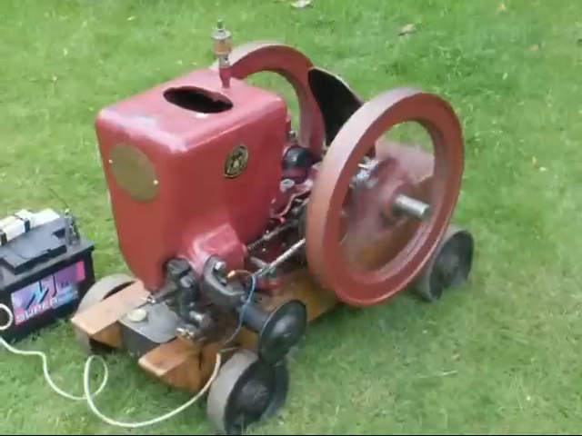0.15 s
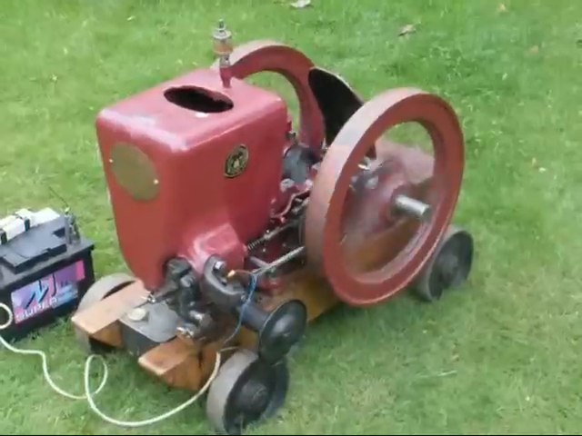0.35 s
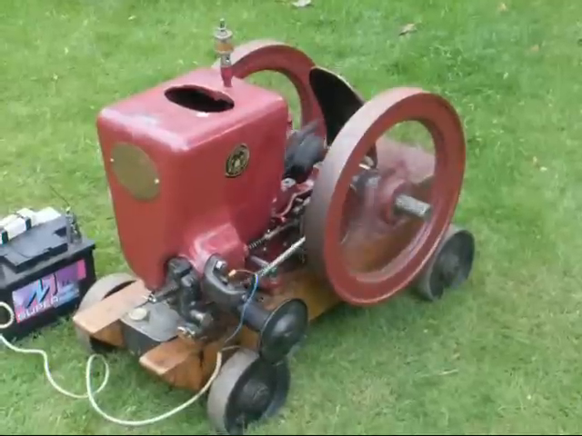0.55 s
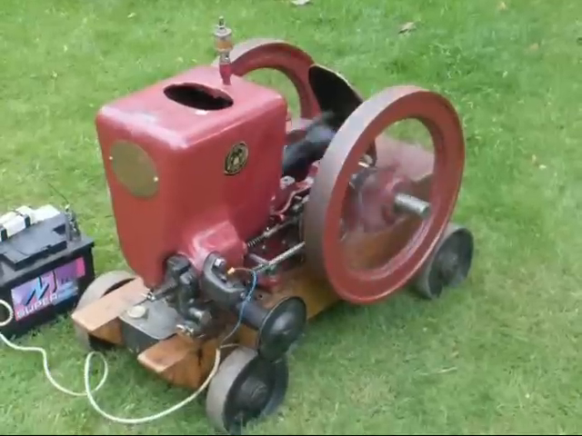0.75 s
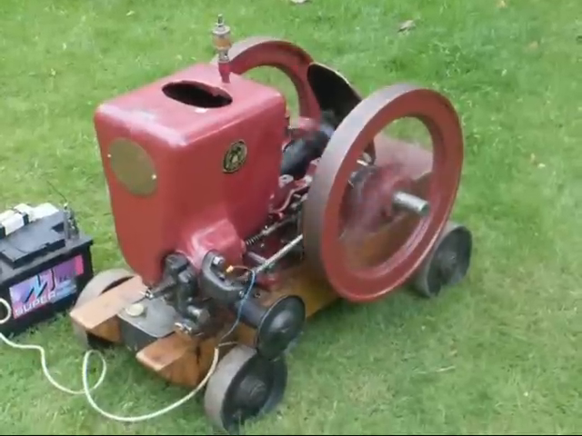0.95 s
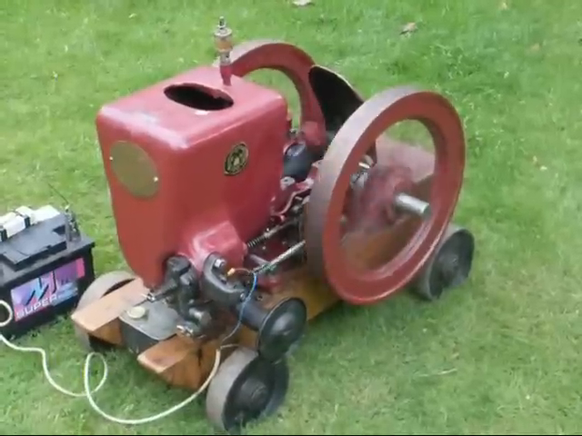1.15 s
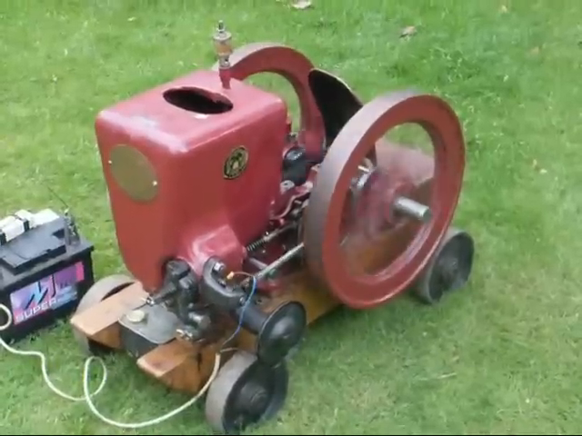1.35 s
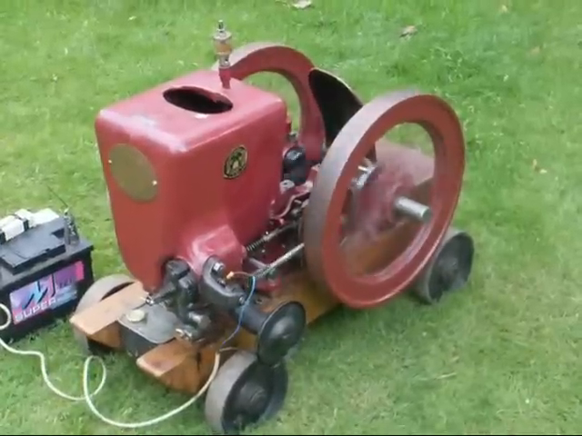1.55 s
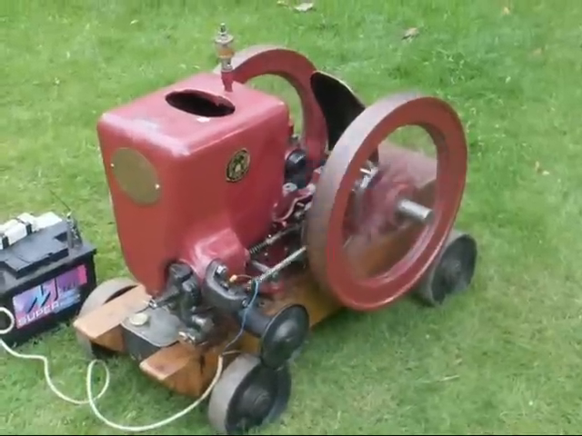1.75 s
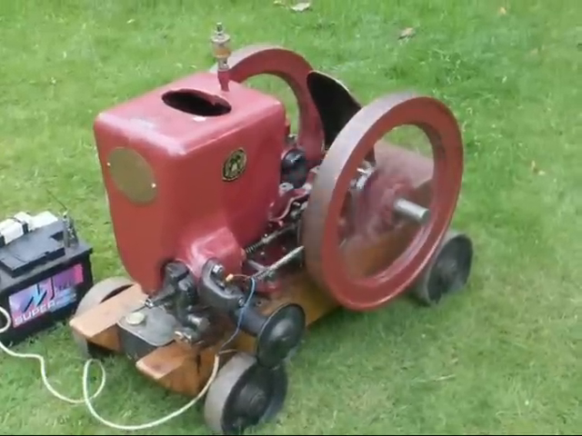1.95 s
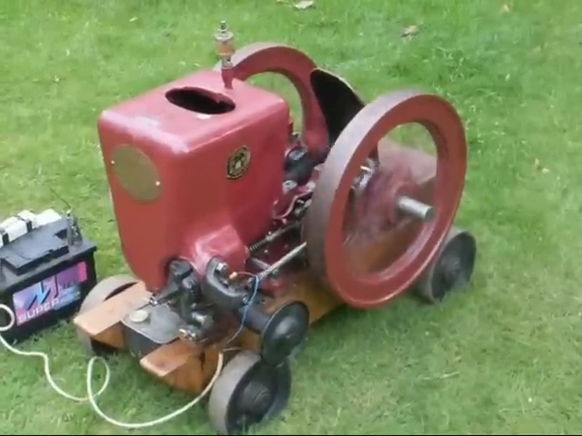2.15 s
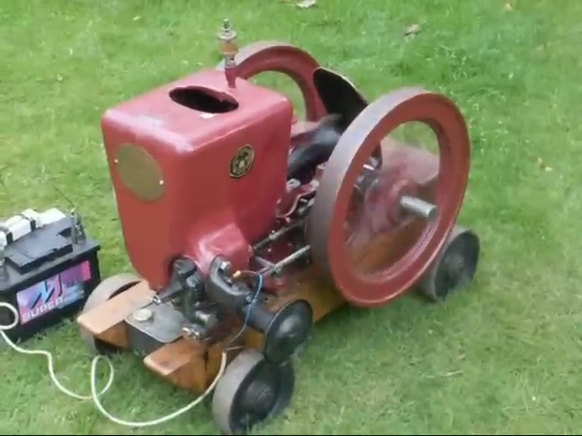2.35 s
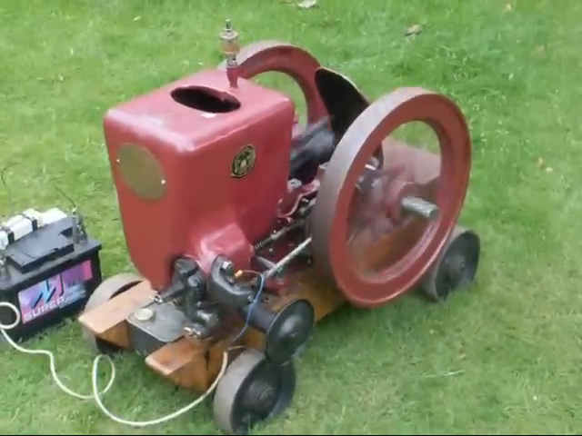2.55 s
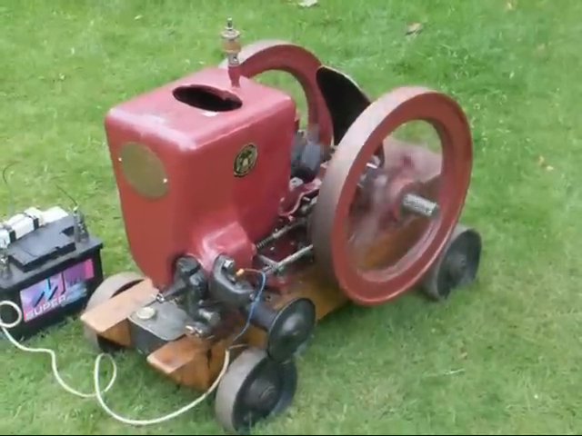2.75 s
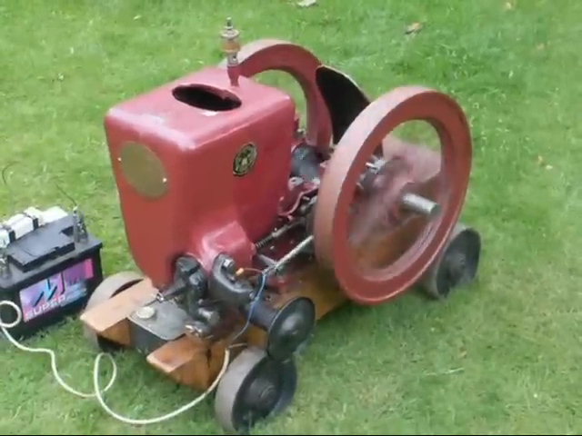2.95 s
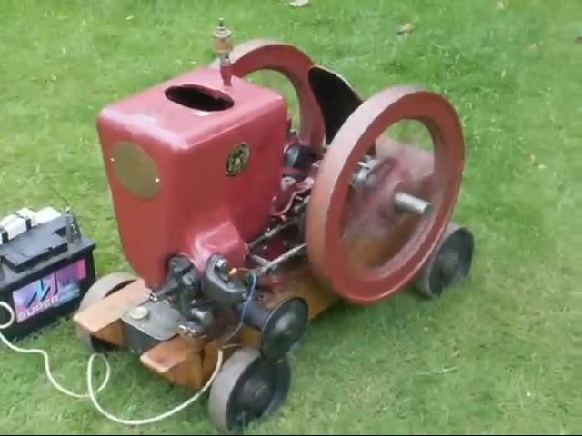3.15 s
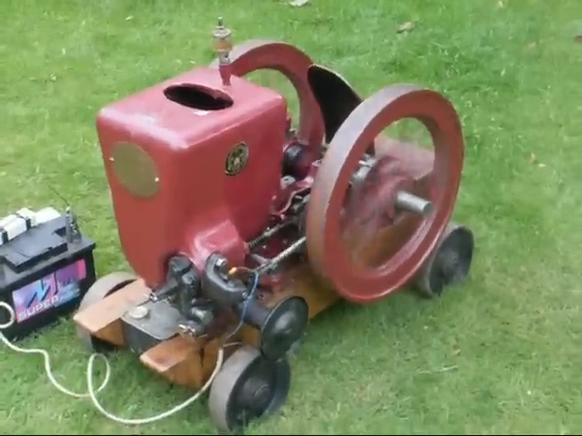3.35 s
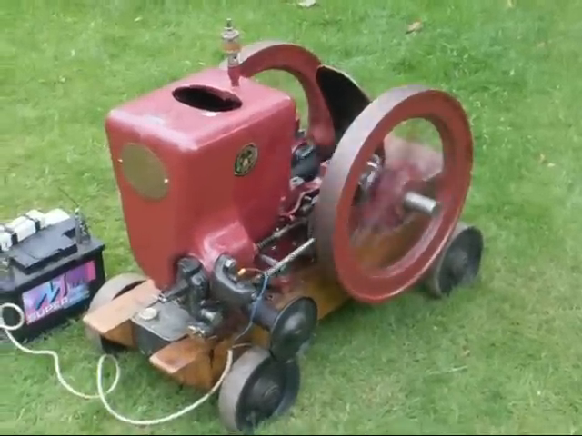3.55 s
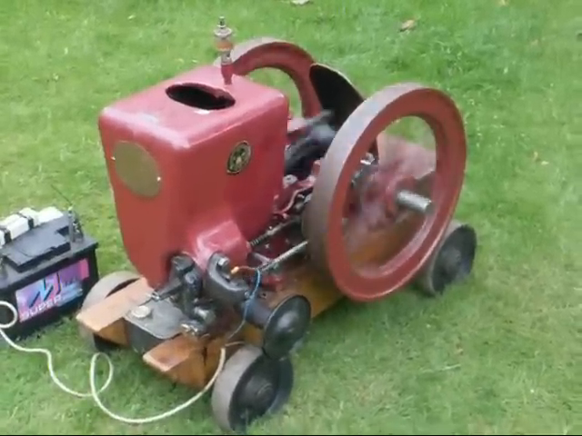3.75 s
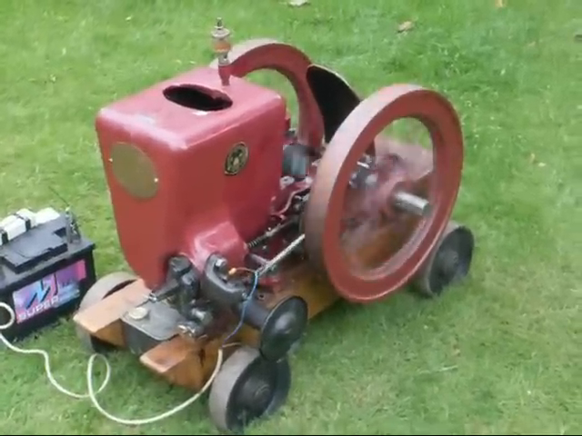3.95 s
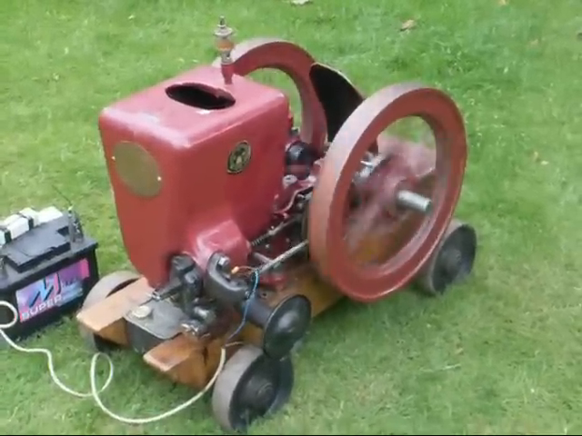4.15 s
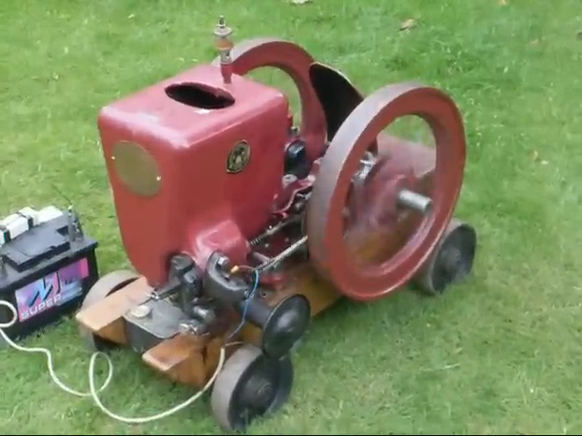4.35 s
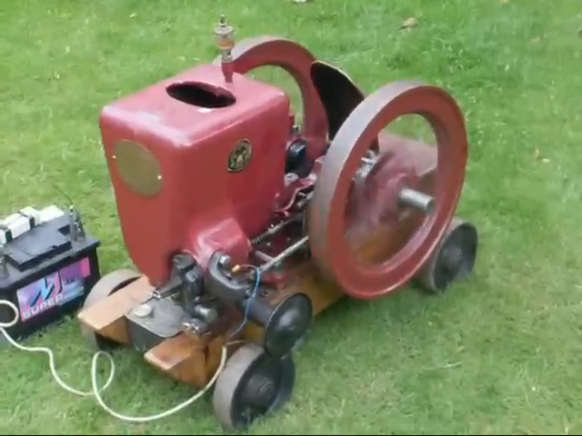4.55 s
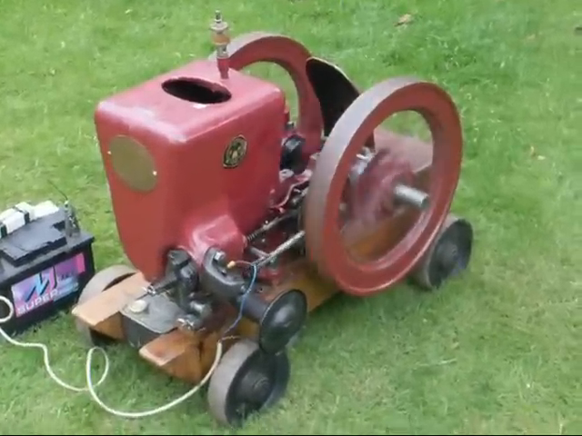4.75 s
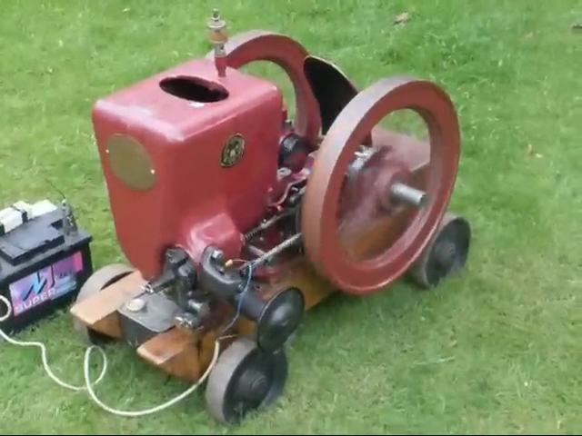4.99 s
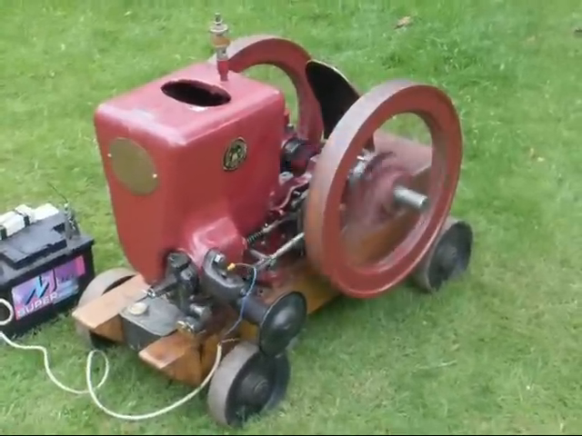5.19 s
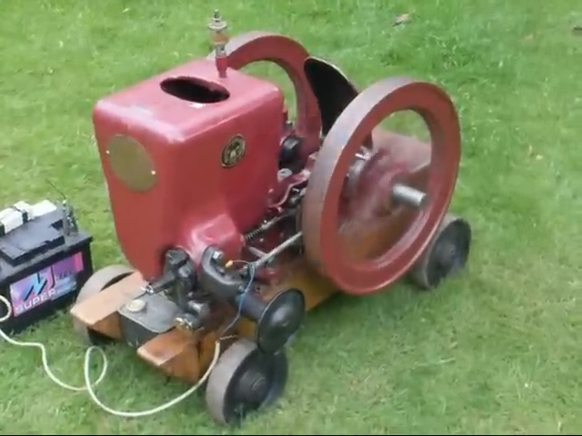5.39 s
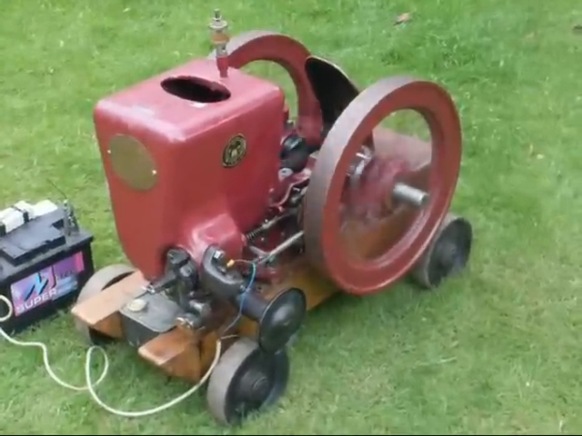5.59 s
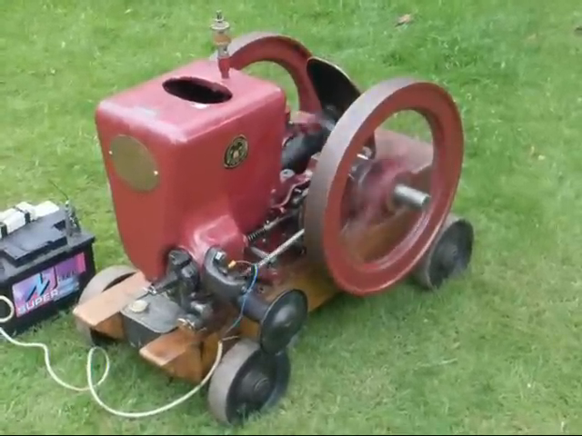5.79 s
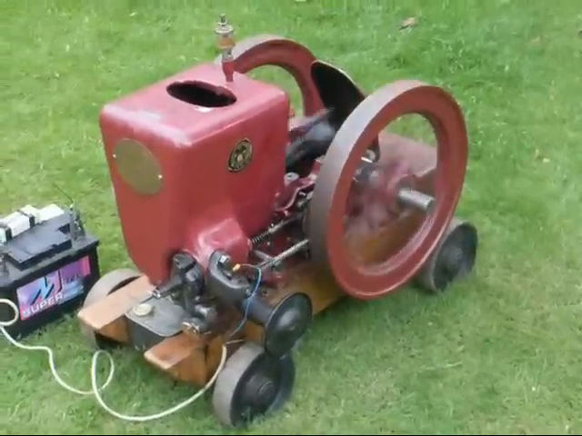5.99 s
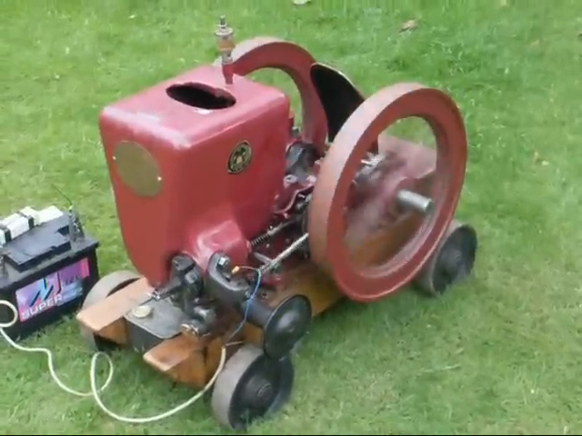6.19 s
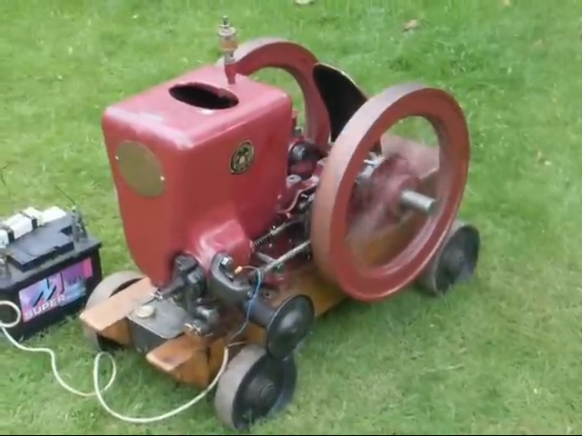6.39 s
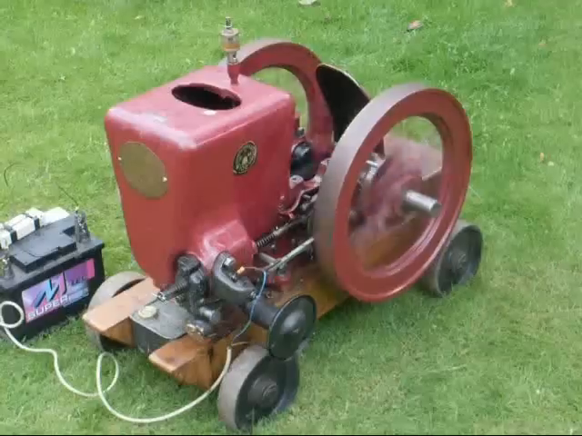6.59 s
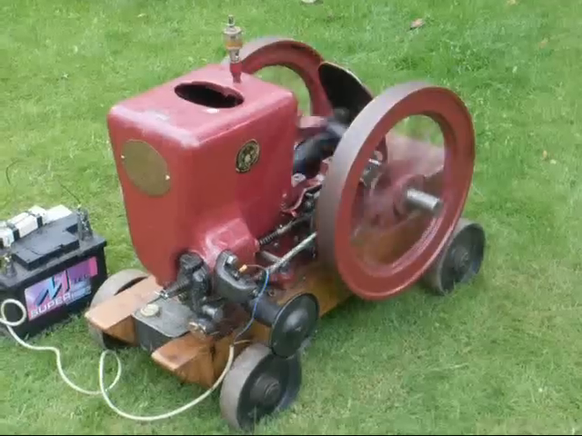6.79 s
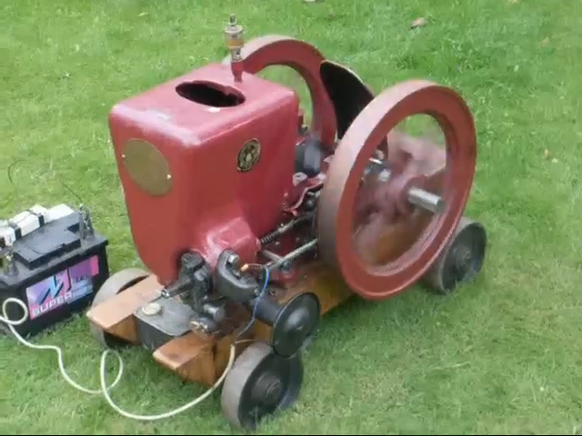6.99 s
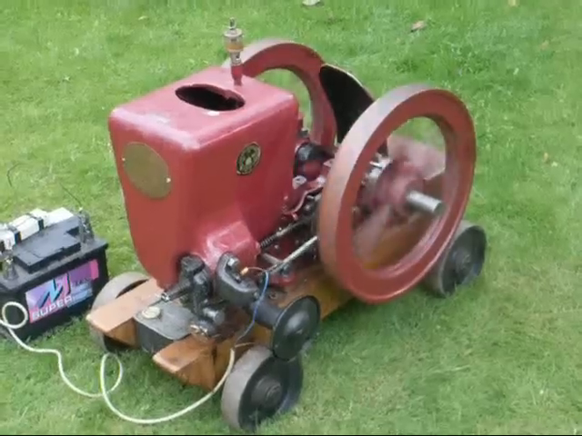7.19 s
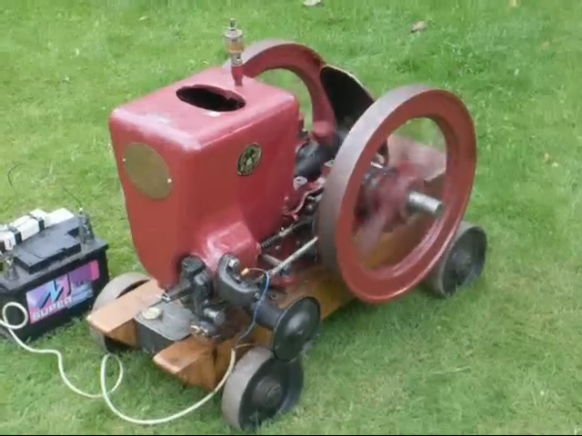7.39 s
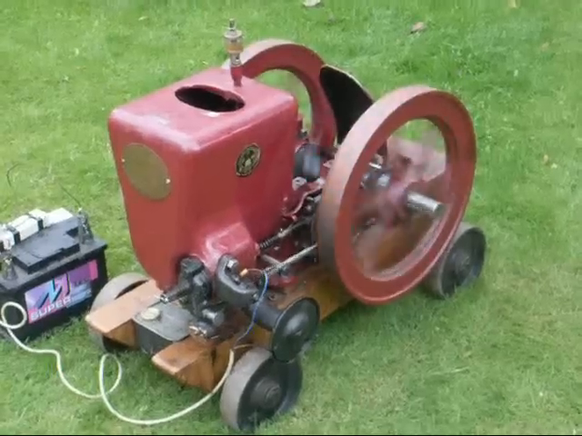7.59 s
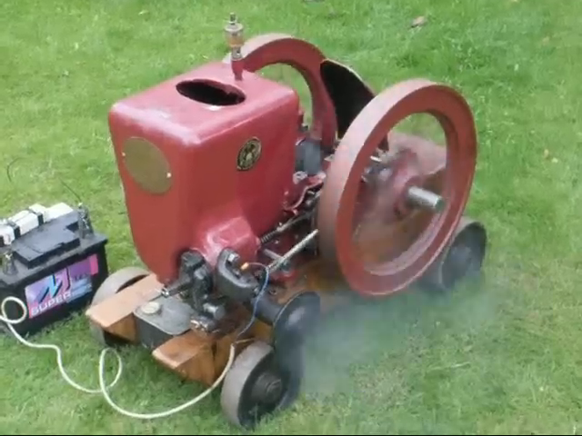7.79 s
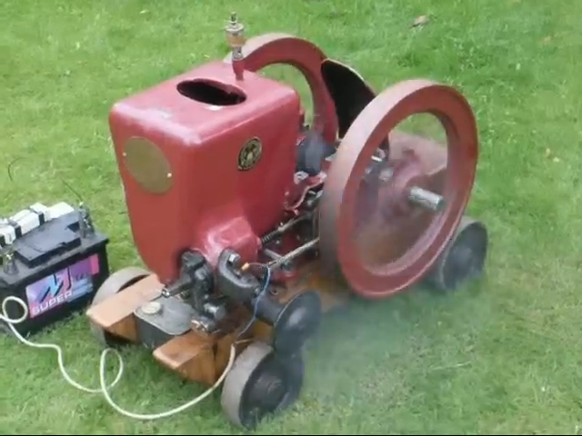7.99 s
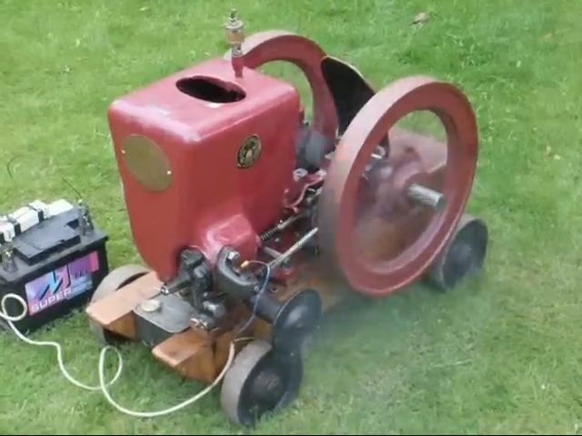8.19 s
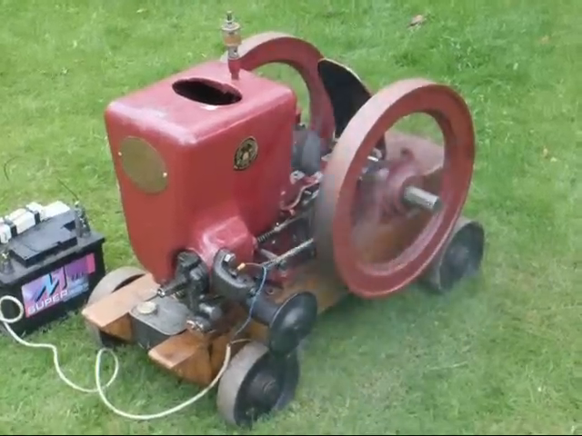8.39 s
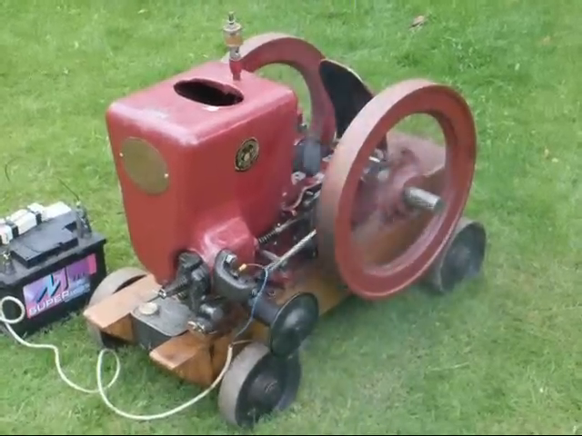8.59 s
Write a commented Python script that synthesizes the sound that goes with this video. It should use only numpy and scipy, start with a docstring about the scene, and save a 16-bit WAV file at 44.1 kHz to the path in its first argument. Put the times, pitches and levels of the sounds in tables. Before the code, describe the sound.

An old single-cylinder engine clacks and rattles as it coasts outdoors, firing three sharp hissing bangs over ringing flywheels and light wind.

```python
"""A clack of valve gear and a short snort of air open the scene, over ringing flywheels, gear chatter and wind.
An old single-cylinder hit-and-miss engine idles on a wooden skid on a lawn; it fires three times with a hissing
bang and coasts between. Clacks, thuds and knocks are fading tones with rattling noise; the gears are random
ticks through iron resonances; breath, escaping gas and wind are coloured noise; the crank paces the coasting."""
import sys
import numpy as np
from scipy.fft import rfft, irfft, next_fast_len
from scipy.io import wavfile
from scipy.ndimage import map_coordinates

SR = 44100
rng = np.random.default_rng(int(sys.argv[2]) if len(sys.argv) > 2 else 0)


def to_wav(s):
    """Save 16-bit WAV."""
    ch = np.atleast_2d(s).T  # columns
    pcm = np.round(np.clip(ch, -1, 1) * 32767)  # PCM
    wavfile.write(sys.argv[1], SR, pcm.astype(np.int16))


N = 381024

# Contacts of the valve gear: t/s, blow level/dB, low balance/dB, high balance/dB, rattle t60/s,
# loudest ring f/Hz, rim ring level/dB against the blow (before RIM_DB)
CLACKS = [(0.0014, -22, -16.5, -10, 0.4, 3280, -15), (0.1014, -13.5, -14, -13, 0.31, 3720, -12.5),
          (0.1474, -34, -11, -3, 0.28, 3520, -15), (0.2058, -18.5, -11, -12, 0.64, 3590, -7),
          (0.2502, -12.5, -8.5, -15, 0.26, 3320, -20), (0.2651, -9, -13, -7, 0.16, 3760, -22),
          (0.3615, -10.5, -11, -14.5, 0.2, 2980, -14), (0.387, -16.5, -17, -14, 0.28, 3050, -12),
          (0.401, -15.5, -21, -16, 0.13, 3030, -18), (0.5117, -27, -8, -3, 0.18, 2730, -15),
          (0.533, -11.5, -10, -12, 0.3, 2880, -23), (0.564, -10, -25, -20, 0.26, 3100, -21),
          (0.669, -37, -9, -3, 0.28, 3380, -15), (0.7048, -12.5, -10.5, -13, 0.29, 2990, -13.5),
          (0.7374, -13, -22, -14, 0.19, 3555, -14), (0.862, -27, -7, -5, 0.25, 3650, -15),
          (0.8855, -10.5, -10.5, -14, 0.21, 2870, -20), (0.9188, -12.5, -17.5, -13.5, 0.25, 2560, -13),
          (0.9669, -22, -7, -12, 0.14, 3500, -18), (1.0259, -30, 2, -4, 0.11, 2980, -15),
          (1.066, -10, -14, -18.5, 0.21, 2970, -18.5), (1.094, -16, -25, -11, 0.21, 2940, -15),
          (1.184, -28.5, -26, -8, 0.27, 2960, -15), (1.2272, -21.5, -9, -8, 0.2, 2540, -15),
          (1.2513, -15, -10, -15, 0.45, 3020, -8), (1.2914, -13, -20, -13.5, 0.27, 3520, -13),
          (1.444, -14, -11.5, -11.5, 0.24, 2890, -18), (1.5037, -17.5, -16.5, -12.5, 0.26, 3470, -14),
          (1.609, -26.5, -6, -6, 0.15, 3650, -15), (1.642, -13, -11.5, -13, 0.26, 2680, -18),
          (1.6867, -13.5, -19, -17, 0.28, 2840, -18), (1.7353, -24, -5, -13, 0.23, 2640, -15),
          (1.8387, -10, -12, -13.5, 0.11, 2860, -19), (1.8758, -20, -18, -12, 0.2, 3200, -15),
          (1.914, -18.5, -16.5, -16, 0.45, 3520, -10), (2.0098, -26, -9.5, -6, 0.12, 2590, -20),
          (2.0395, -22.5, -10, -11, 0.22, 3050, -24), (2.0887, -22, -13.5, -4.5, 0.17, 3480, -22),
          (2.147, -19, -14, -14, 0.23, 2730, -20), (2.2493, -10.5, -15, -15.5, 0.29, 3040, -11),
          (2.2854, -20, -22, -8, 0.18, 3320, -15), (2.4021, -18.5, -16, -15, 0.72, 3760, -21),
          (2.4573, -20, -11, -5, 0.11, 2890, -6), (2.5098, -13.5, -14, -12.5, 0.29, 3000, -14.5),
          (2.6307, -14, -16, -18, 0.13, 3000, -32), (2.6747, -15.5, -11.5, -12.5, 0.35, 3000, -12),
          (2.7257, -16.5, -22, -11, 0.38, 2880, -6), (2.8138, -29, -13, -23, 0.29, 3000, -15),
          (2.8356, -17.5, -15, -15, 0.41, 2960, -14), (2.8979, -12.5, -13.5, -14, 0.12, 2970, -7.5),
          (2.9314, -19, -19, -17, 0.42, 3040, -12), (3.068, -16, -14, -14.5, 0.25, 2510, -14),
          (3.1375, -12, -14, -14, 0.16, 2890, -17), (3.18, -18.5, -22, -15, 0.25, 2580, -21),
          (3.2803, -28.5, -17, -10, 0.35, 3070, -15), (3.3051, -14, -19, -12, 0.29, 2930, -14),
          (3.366, -15.5, -14, -12, 0.13, 3050, -11), (3.4101, -15, -20, -10.5, 0.24, 3200, -24),
          (3.482, -29, -4, -13, 0.23, 2640, -15), (3.5466, -21.5, -12.5, -17, 0.26, 2900, -15),
          (3.6275, -10.5, -13.5, -13, 0.16, 3610, -14.5), (3.679, -19.5, -17, -8, 0.17, 2480, -11),
          (3.7849, -16.5, -14.5, -13, 0.3, 2900, -8), (3.8753, -11, -16, -13.5, 0.22, 3640, -23),
          (3.918, -22, -19, -15, 0.48, 3520, -20), (4.0616, -18, -14, -14, 0.29, 2940, -15),
          (4.1419, -13.5, -14.5, -9.5, 0.3, 3200, -20), (4.3077, -10, -26, -14.5, 0.21, 3030, -18),
          (4.363, -27.5, -11, -12.5, 0.52, 2630, -13), (4.468, -13, -16, -13, 0.35, 3000, -15),
          (4.5032, -6.5, -8, -0.5, 0.13, 2440, -22), (4.62, -11, -11.5, -15, 0.21, 2870, -16.5),
          (4.656, -16, -13, -11.5, 0.19, 3110, -9), (4.7422, -23.5, -12, -6.5, 0.2, 3490, -8),
          (4.7667, -20.5, -9, -12, 0.25, 2900, -15), (4.785, -19.5, -14, -10, 0.16, 3010, -10),
          (4.812, -14, -11.5, -14, 0.15, 3600, -15), (4.859, -14, -16, -14, 0.31, 3260, -11),
          (4.9763, -21, -12, -16, 0.25, 2530, -23), (5.026, -13, -13.5, -13.5, 0.29, 2960, -17),
          (5.072, -14.5, -20, -11.5, 0.26, 3520, -6.5), (5.1747, -16.5, -15.5, -11.5, 0.28, 2520, -15),
          (5.228, -12.5, -19, -15.5, 0.16, 3590, -20), (5.2722, -19.5, -20, -16, 0.21, 3230, -17),
          (5.3137, -16, -14, -8.5, 0.17, 2930, -9.5), (5.398, -20, -11, -15, 0.17, 3700, -20),
          (5.4129, -29, -11, -30, 0.13, 3570, -15), (5.4504, -13, -12, -14, 0.19, 3270, -19),
          (5.502, -16.5, -16, -11, 0.41, 3290, -26), (5.5856, -32, -20, -15, 0.37, 3220, -15),
          (5.604, -14, -17, -15, 0.35, 3000, -19), (5.667, -19.5, -12, -10, 0.14, 2970, -20),
          (5.7177, -22, -10.5, -12, 0.22, 2760, -17), (5.7714, -30, -6, -14, 0.42, 2630, -15),
          (5.9053, -13.5, -13, -13, 0.16, 2580, -9), (5.9533, -18, -19, -14, 0.19, 2830, -18),
          (5.9874, -23.5, -15, -13, 0.18, 3740, -19), (6.064, -18.5, -14.5, -11, 0.38, 2900, -21),
          (6.133, -18, -12, -12, 0.21, 3020, -13), (6.1849, -16.5, -17, -13, 0.18, 2930, -17),
          (6.2403, -29.5, -6, -11, 0.37, 2940, -15), (6.315, -15, -21, -14.5, 0.2, 2880, -15),
          (6.3723, -11.5, -14, -13, 0.17, 3020, -11.5), (6.4185, -19, -18, -13.5, 0.3, 3420, -20),
          (6.5478, -24.5, -13, -10, 0.33, 3760, -18), (6.5661, -21.5, -14, -13, 0.16, 3350, -19),
          (6.629, -9, -15.5, -16, 0.16, 3630, -23.5), (6.6749, -21.5, -18, -16.5, 0.45, 3300, -5),
          (6.813, -16.5, -17, -10.5, 0.17, 2900, -15), (6.8854, -11, -15, -12, 0.2, 3310, -22),
          (6.915, -20, -23, -10, 0.3, 2440, -19), (7.0524, -15, -22, -14, 0.17, 2970, -19),
          (7.1023, -24, -25, -5, 0.12, 3100, -24), (7.199, -16, -15.5, -8, 0.22, 3300, -12.5),
          (7.2726, -28, 1, -11, 0.15, 2520, -17), (7.336, -15.5, -15.5, -11.5, 0.27, 2910, -16),
          (7.4533, -30, -2, -7, 0.17, 2410, -15), (7.4726, -17.5, -13, -10, 0.35, 3090, -11),
          (7.6262, -13, -16, -17, 0.17, 3770, -20), (7.7014, -24.5, -8, -17, 0.32, 3030, -17),
          (7.7773, -23, -6.5, -10.5, 0.17, 3020, -17), (7.828, -12.5, -13, -9.5, 0.18, 2500, -17),
          (7.8481, -9, -8, -23, 0.19, 2730, -15), (7.9598, -8.5, -12.5, -15, 0.16, 2860, -13),
          (7.992, -12.5, -19.5, -15.5, 0.24, 3100, -21), (8.085, -27.5, -22, -18, 0.48, 3650, -15),
          (8.1259, -22.5, -11.5, -4.5, 0.15, 2640, -11), (8.1536, -14.5, -12, -14, 0.21, 2990, -12),
          (8.1933, -15.5, -17, -13, 0.28, 3600, -15), (8.2474, -25.5, -9, -15, 0.47, 2640, -17),
          (8.3095, -24.5, -15, -25, 0.36, 2540, -15), (8.3543, -11.5, -14.5, -15, 0.25, 2880, -13),
          (8.3956, -14, -21, -12, 0.2, 3570, -9.5), (8.514, -20, -17, -11, 0.36, 2960, -15),
          (8.556, -8.5, -15, -19, 0.15, 2980, -15), (8.5979, -11, -19, -13.5, 0.2, 3070, -18)]
# Ringing modes of the iron parts: f/Hz, level/dB, t60/s
IRON = [(870, -12, 0.027), (1187, -5, 0.034), (1448, -12.5, 0.078), (1701, -12.5, 0.075),
        (2100, -15, 0.022), (2376, -17.5, 0.13), (2440, -13, 0.11), (2640, -7.5, 0.063), (2840, -10, 0.023),
        (2880, -8, 0.035), (3034, -9.5, 0.043), (3257, -11, 0.1), (3220, -13.5, 0.022), (3520, -9.5, 0.081),
        (3680, -13.5, 0.022), (3760, -10, 0.057), (4380, -26, 0.17), (4656, -13, 0.054), (4856, -17, 0.028),
        (5840, -49, 0.051), (6820, -23, 0.018), (7370, -23.5, 0.014), (8640, -26.5, 0.011),
        (9800, -25.5, 0.026)]
# Ringing modes of the steel push rod: f/Hz, level/dB, t60/s
ROD = [(1928, -5, 0.32), (2530, -7, 0.27), (2960, 1.5, 0.092), (2960, -17, 0.09), (3200, 2.5, 0.075),
       (3520, -6, 0.22), (3450, -12, 0.16), (5550, -5.5, 0.15), (6320, 0, 0.073)]
# Dense overtones of the casting, relative spectrum: f/Hz, level per Hz/dB
CASTING = [(290, -5.5), (500, -12.5), (1220, -2), (1290, 0), (1570, -6), (1980, -5), (2250, -11),
           (2960, -11), (3620, -7.5), (4180, -11.5), (6240, -13.5), (6610, -25), (7200, -21), (11100, -28),
           (15400, -19.5)]
# Rings against the blow in dB; the rod sings out as the engine slows
IRON_RING_DB, ROD_RING_DB, ROD_DB_PER_RPS = -10.5, -22, -1.5

# The crank in each coast: start t/s, t/s of a moment with the piston at the top, speed then/(turns/s)
COASTS = [(0, .059, 3.7), (.3, 2.556, 4.56), (4.55, 4.909, 4.86), (7.9, 8.241, 5.02)]
DRAG_RPS2 = .515  # speed lost each second, turns/s
REFERENCE_RPS = 4.6  # speed at which the speed-dependent levels hold, turns/s

# Gear chatter: level in dB, growth in dB per turn/s
CHATTER_DB, CHATTER_DB_PER_RPS = -50, 3.5
# Air at the open valve: level in dB, growth in dB per turn/s, swing within a turn in dB, loudest point in turns
HISS_DB, HISS_DB_PER_RPS, HISS_SWING_DB, HISS_TURN = -58.5, 8.5, 6.5, 0.32
# Relative spectrum of the piston's breath: f/Hz, level per Hz/dB
BREATH = [(1200, -5), (2000, 7.5), (3000, 0.5), (4700, 0.5), (7000, -5), (9500, -6.5), (11000, -9),
          (13000, -7.5), (15400, -3.5)]
# Strokes that blow hard through the closing valve: middle t/s, level/dB, half-length to 1/e /s
SNORTS = [(.012, -35, .03), (4.19, -33.5, 0.037), (6.93, -34.5, 0.043), (7.49, -36, 0.039),
          (7.71, -38.5, 0.022), (.77, -43, 0.017)]

# Rim tones of the flywheels: f/Hz, level/dB before waver
FLYWHEELS = [(1282, -4.5), (1310, -1)]
# Spoke resonance, applied twice: f/Hz, width/Hz, level/dB for one pass
SPOKES = [(1310, 57, 0)]
# Ring against the blow in dB, steady ring in dB, fade t60 in s, swell in s
RIM_DB, RIM_REST_DB, RIM_T60_S, RIM_RISE_S = -10.5, -57, 0.72, 0.018

# Skid resonances, applied twice: f/Hz, width/Hz, level/dB for one pass
SKID = [(311, 41, 1.5), (398, 94, -1)]
# The skid's bump: level in dB under a clack, middle pitch and random pitch spread in Hz
BUMP_DB, BUMP_HZ, BUMP_SPREAD_HZ = -9, 330.2, 23
# The engine shakes its skid four times a turn: point/turns, level/dB
SHAKES = [(.04, -45.5), (.3, -42), (0.549, -35.5), (0.791, -39)]
# Port resonances, applied twice: f/Hz, width/Hz, level/dB for one pass
PORT = [(656, 186, 0), (977, 210, 2)]
# The puff is strongest at a middle speed: level in dB, that speed and its spread in turns/s
PUFF_DB, PUFF_RPS, PUFF_WIDE_RPS = -29.5, 4.34, .45

# Wind buffeting: t/s, level/dB before random swells
WIND = [(0.0, -54), (0.38, -49.5), (1.03, -59), (1.92, -46), (2.21, -55), (3.13, -52.5), (3.37, -65),
        (3.7, -51), (4.43, -65.5), (4.69, -52), (5.05, -69), (5.39, -64), (7.22, -73), (7.39, -65),
        (7.77, -67), (7.92, -54), (8.3, -72), (8.64, -56)]
# Relative spectrum of the buffeting: f/Hz, level per Hz/dB
RUMBLE = [(12, -39), (20, -7), (70, 4), (172, -5), (286, -10), (325, -10), (492, -12.5), (600, -21.5),
          (780, -40), (1320, -120)]
# Gusts on the microphone: middle t/s, level/dB, half-length to 1/e /s
GUSTS = [(.3, -44, .07), (.53, -44, 0.025), (.87, -51, 0.015), (.98, -49, 0.025), (1.51, -45, 0.038),
         (1.6, -44, 0.014), (1.86, -26, 0.019), (1.93, -32, 0.034), (2.23, -43, 0.022), (2.95, -49, 0.054),
         (3.31, -46, 0.026), (3.61, -40, 0.024), (3.87, -46, 0.025), (4.2, -52, 0.033), (4.57, -44, .04),
         (5.01, -52, .02), (7.28, -54, 0.061), (7.44, -52, .06), (7.92, -41, 0.045), (8.02, -53, .02),
         (8.51, -41, 0.02)]
# Relative spectrum of the gusts: f/Hz, level per Hz/dB
FLUTTER = [(12, -35), (20, -4), (123, -1.5), (165, -1.5), (462, -13), (483, -17), (700, -17), (910, -46),
           (1540, -120)]
# Relative spectrum of the distant outdoor hush: f/Hz, level per Hz/dB
AIR = [(20, -40), (100, -24), (250, -13), (500, 14), (1200, -1), (3000, -12), (7000, -27), (11000, -35),
       (15400, -28)]

# The skid rocks once a turn: level in dB, pitch in Hz, point in turns
ROCK_DB, ROCK_HZ, ROCK_TURN = -43, 165, .46

# Firings: t/s, relative jet level/dB, thud level/dB, skid kick level/dB
FIRINGS = [(0.2588, 0, -9, -19), (4.4967, -0.5, -10, -19.5), (7.8433, 0, -12.5, -20.5)]
# Relative spectrum of the escaping gas: f/Hz, level per Hz/dB
BLAST = [(290, -55), (500, -17), (1130, -3.5), (1290, -1), (1670, -15), (2070, 0), (2880, -7), (3670, -7.5),
         (4890, 3), (5720, -14.5), (6900, 2), (8550, -7.5), (9590, -4), (11100, -8.5), (15400, -5.5)]
# Exhaust pot walls: f/Hz, width/Hz, relative level/dB
POT_WALLS = [(1300, 21, -8), (2170, 18, -6), (2280, 23, -8), (3200, 27, -1), (3760, 28, -8), (4100, 40, 0),
             (4870, 70, 8), (5460, 29, 13), (6100, 40, 13), (7160, 23, -14), (7400, 40, -23)]
# Tones of the exhaust pot under the thud: f/Hz, relative level/dB, t60/s
POT_TONES = [(267, 7, 0.012), (369, -17.5, 0.11), (835, -5, 0.043)]

# Hollow knocks and pops: t/s, level/dB, f/Hz, t60/s
KNOCKS = [(0.316, -25.5, 360, 0.11), (1.338, -44, 643, 0.07), (1.92, -22.5, 278, 0.065),
          (3.604, -32, 330, 0.08), (4.091, -28, 295, 0.14), (4.554, -30, 372, 0.1), (6.611, -38, 337, 0.15),
          (6.838, -28.5, 294, 0.21), (6.885, -30.5, 375, 0.087), (7.138, -36, 650, 0.1),
          (7.404, -32, 291, 0.17), (7.445, -26.5, 378, 0.13)]

TOP_HZ = 15450  # upper band limit


def amp(db):
    """Gain of a level in dB."""
    return 10 ** (np.asarray(db) / 20)


def unit(x):
    """x at rms 1."""
    return x / np.sqrt(np.mean(x ** 2) + 1e-20)


def wobble(rate):
    """A smooth random curve, rate knots a second."""
    knots = rng.standard_normal(int(N * rate / SR) + 4)
    return map_coordinates(knots, [np.arange(N) * rate / SR])


def filtered(x, response):
    """x shaped by a complex response of frequency, padded so that tails do not wrap."""
    size = next_fast_len(x.shape[-1] + 8192)
    spectrum = rfft(x, size) * response(np.fft.rfftfreq(size, 1 / SR))
    return irfft(spectrum, size)[..., :x.shape[-1]]


def colour(points):
    """Response through (f/Hz, level/dB) points on a log frequency axis."""
    f, db = np.transpose(points)
    return lambda hz: amp(np.interp(np.log(hz + 1), np.log(f + 1), db))


def resonant(peaks):
    """Causal response of (f/Hz, width/Hz, level/dB) resonances with alternating polarity."""
    return lambda f: sum((-1) ** k * amp(db) * 1j * f * width / (hz * hz - f * f + 1j * f * width)
                         for k, (hz, width, db) in enumerate(peaks))


def twice_resonant(peaks):
    """The resonances applied twice, for narrower peaks with steeper skirts."""
    return lambda f: resonant(peaks)(f) ** 2


def iron(f):
    """The iron parts as a bank of resonances, each as wide as its fade demands."""
    return resonant([(hz, np.log(1000) / np.pi / t60, db) for hz, db, t60 in IRON])(f)


def noise(response, shape=N):
    """Coloured noise of rms 1."""
    return unit(filtered(rng.standard_normal(shape), response))


def damped(hz, t60, t, attack):
    """A fading tone with a soft start."""
    return amp(-60 * t / t60) * (1 - np.exp(-t / attack)) * np.sin(2 * np.pi * hz * t)


def swells(rows):
    """Sum of bell-shaped envelopes of (middle t/s, level/dB, half-length/s) rows."""
    t = np.arange(N) / SR
    return sum(amp(db) * np.exp(-((t - s) / length) ** 2) for s, db, length in rows)


def add(out, s, x):
    """Mix x in at time s."""
    i = max(round(s * SR), 0)
    out[i:i + len(x)] += x[:len(out) - i]


def crank():
    """Angle in turns and speed in turns/s: each firing kicks the flywheels, drag slows them."""
    t = np.arange(N) / SR
    start, top, top_rps = np.transpose(COASTS)
    coast = np.searchsorted(start, t, side="right") - 1
    since = t - top[coast]
    angle = top_rps[coast] * since - DRAG_RPS2 * since ** 2 / 2
    return angle, top_rps[coast] - DRAG_RPS2 * since


def once_a_turn(turn):
    """Times and speeds at which the crank passes a point of its turn."""
    angle, rps = crank()
    i = np.flatnonzero(np.diff(np.floor(angle - turn)) == 1)
    return i / SR, rps[i]


def loose_rattle(shape, t):
    """Loose parts: lumpy noise in the casting's colour plus sparse rebounds ringing the iron."""
    grit = rng.standard_normal(shape)
    rebounds = grit * (rng.random(shape) < 300 / SR)  # about 300 a second
    knots = rng.standard_normal((shape[0], 40))
    places = np.indices(shape) * [[[1]], [[80 / SR]]]  # 80 knots a second
    lumps = amp(3.6 * map_coordinates(knots, places, order=1))
    return unit(filtered(grit * lumps, colour(CASTING))) + amp(-1.5) * unit(filtered(rebounds, iron))


def clacks():
    """Each contact rings iron and push rod at new strengths and leaves the loose parts rattling."""
    out, t = np.zeros(N), np.arange(SR // 4) / SR
    hz, level_db, t60 = np.transpose(IRON + ROD)
    on_rod = np.arange(len(hz)) >= len(IRON)
    modes = amp(-60 * t / t60[:, None]) * np.exp(2j * np.pi * hz[:, None] * t)
    rps = crank()[1]
    draws = rng.standard_normal((len(CLACKS), 2, len(hz)))
    rattle = loose_rattle((len(CLACKS), len(t)), t)
    # the blow itself stands above the ring
    rise = (1 - np.exp(-t / 0.0013)) * (1 + 0.43 * amp(-60 * t / 0.011))
    for row, (scatter, phase), loose in zip(CLACKS, draws, rattle):
        s, db, low_db, high_db, rattle_t60, near_hz, _ = row
        # where the blow lands sets the balance of lows and highs
        tilt = colour([(1300, low_db + 6.5), (2200, 0), (4200, 0), (6000, high_db + 12.5)])
        rod_db = ROD_RING_DB + ROD_DB_PER_RPS * (rps[round(s * SR)] - REFERENCE_RPS)
        sizes = np.where(on_rod, amp(rod_db), amp(IRON_RING_DB) * tilt(hz)) * amp(level_db)
        # the part that is struck rings loudest
        sizes = sizes * amp(12.7 * np.exp(-((hz - near_hz) / 90) ** 2))
        varied = sizes * amp(2.9 * scatter)
        varied *= np.linalg.norm(sizes) / np.linalg.norm(varied)  # scatter keeps the total strength
        ring = ((varied * np.exp(2j * phase)) @ modes).imag
        shake = filtered(loose * amp(-60 * t / max(rattle_t60, .03)), tilt)
        add(out, s - .001, amp(db) * rise * (ring + amp(-11.5) * shake))
    return out


def gear_chatter():
    """Gear teeth tick at random into the iron and stir the casting, louder at speed."""
    rps = crank()[1]
    level_db = CHATTER_DB + CHATTER_DB_PER_RPS * (rps - REFERENCE_RPS)
    ticks = (rng.random(N) < 300 / SR) * np.tanh(rng.standard_normal(N))  # about 300 a second
    teeth = ticks * amp(3 * wobble(40))
    casting = amp(7.4 * wobble(45)) * noise(colour(CASTING))
    return amp(level_db) * (unit(filtered(teeth, iron)) + amp(-7.0) * casting)


def piston_breath():
    """The piston pumps air through the open exhaust valve: hiss that swings each turn, with hard snorts."""
    angle, rps = crank()
    swing_db = HISS_SWING_DB * np.cos(2 * np.pi * (angle - HISS_TURN))
    level_db = HISS_DB + HISS_DB_PER_RPS * (rps - REFERENCE_RPS) + swing_db
    hiss = amp(4.6 * wobble(60)) * noise(colour(BREATH))
    return (amp(level_db) + swells(SNORTS)) * hiss


def flywheel_ring():
    """Wavering rim tones and spoke noise ring steadily, and every clack feeds them energy that fades."""
    t = np.arange(N) / SR
    rims = sum(amp(db + 2 * wobble(16)) * np.sin(2 * np.pi * hz * t + 1.4 * wobble(20))
               for hz, db in FLYWHEELS)
    rims += amp(-4.5) * noise(twice_resonant(SPOKES))
    energy, fade = np.full(N, amp(RIM_REST_DB) ** 2), t[:SR // 2]
    swell = 1 - np.exp(-fade / RIM_RISE_S)
    for s, db, *_, rim_db in CLACKS:
        level = amp(db + rim_db + RIM_DB - 60 * fade / RIM_T60_S)
        add(energy, s, (level * swell) ** 2)
    return np.sqrt(energy) * rims


def skid():
    """The wooden skid murmurs, and drums in short low tones under the clacks and the shaking engine."""
    out, t = amp(-54.0) * noise(twice_resonant(SKID)), np.arange(SR // 4) / SR
    for s, db, low_db, *_ in CLACKS:
        size, pitch = rng.standard_normal(2)
        bump = damped(BUMP_HZ + BUMP_SPREAD_HZ * pitch, 0.12, t, 0.002)
        add(out, s, amp(db + low_db + BUMP_DB + 2.5 * size) * bump)
    for turn, db in SHAKES:
        for s in once_a_turn(turn)[0]:
            size, pitch = rng.standard_normal(2)
            bump = damped(BUMP_HZ + BUMP_SPREAD_HZ * pitch, 0.084, t, 0.007)
            add(out, s, amp(db + 4.7 * size) * bump)
    return out


def port():
    """The port resonates steadily and puffs once a turn in two fading tones."""
    out, t = amp(-55) * noise(twice_resonant(PORT)), np.arange(SR // 4) / SR
    puff = damped(653.0, 0.053, t, 0.0034) + amp(-8.5) * damped(767, 0.1, t, 0.0071)
    for s, rps in zip(*once_a_turn(0)):
        strength = np.exp(-((rps - PUFF_RPS) / PUFF_WIDE_RPS) ** 2 / 2)
        add(out, s - .003, amp(PUFF_DB + 1.6 * rng.standard_normal()) * strength * puff)
    return out


def wind():
    """Lumpy buffeting at the microphone, brighter flutter in the gusts, and a faint hush."""
    s, db = np.transpose(WIND)
    buffet_db = np.interp(np.arange(N) / SR, s, db)
    buffet = amp(buffet_db + 1.8 * wobble(7)) * unit(amp(2 * wobble(40)) * noise(colour(RUMBLE)))
    gusts = swells(GUSTS) * unit(amp(2.8 * wobble(70)) * noise(colour(FLUTTER)))
    return buffet + gusts + amp(-56) * noise(colour(AIR))


def rocking():
    """A soft low thump of the skid on the turf, once a turn."""
    out, t = np.zeros(N), np.arange(SR // 4) / SR
    for s in once_a_turn(ROCK_TURN)[0]:
        add(out, s, amp(ROCK_DB + 2.3 * rng.standard_normal()) * damped(ROCK_HZ, 0.066, t, 0.0062))
    return out


def firings():
    """The exhaust valve opens on hot gas: a thud in the pot, a spitting jet, then the skid kicks back."""
    out, t = np.zeros(N), np.arange(SR // 4) / SR
    for s, db, thud_db, kick_db in FIRINGS:
        # a short burst over a longer tail
        jet = (1 - np.exp(-t / 0.00084)) * (np.exp(-(t / 0.021) ** 2) + amp(-6.5 - 60 * t / 0.25))
        # turbulent bursts, each 32 samples long
        spit = amp(2.4 * rng.standard_normal(len(t) // 32 + 1)).repeat(32)[:len(t)]
        add(out, s + .003, amp(db - 12) * jet * spit * noise(colour(BLAST), len(t)))
        walls = (1 - np.exp(-t / 0.0052)) * noise(resonant(POT_WALLS), len(t))
        add(out, s + .003, amp(db - 23.0 - 60 * t / 0.28) * walls)
        thud = sum(amp(tone_db) * damped(hz, t60, t, 0.0017) for hz, tone_db, t60 in POT_TONES)
        add(out, s, -amp(thud_db) * thud)
        add(out, s + 0.0199, -amp(kick_db) * damped(127.0, 0.085, t, 0.0022))
    return out


def knocks():
    """Something hollow knocks and pops: single fading tones."""
    out, t = np.zeros(N), np.arange(SR // 4) / SR
    for s, db, hz, t60 in KNOCKS:
        add(out, s, amp(db) * damped(hz, t60, t, 0.0022))
    return out


def scene():
    """All sources at one microphone; the small moving parts radiate no deep bass."""
    parts = clacks() + gear_chatter() + piston_breath() + flywheel_ring() + skid() + port() + knocks()
    parts = filtered(parts, lambda hz: (1j * hz / (170 + 1j * hz)) ** 3)  # three low cuts at 170 Hz
    return (parts + wind() + rocking() + firings())[None]


def record(dry):
    """The converter clips with a rounded knee at full scale, then a steep filter ends the band at TOP_HZ."""
    clipped = dry / (1 + np.abs(dry) ** 12) ** (1 / 12)
    return filtered(clipped, lambda hz: 1 / (1 + (hz / TOP_HZ) ** 120))


dry = scene()
out = record(dry)
to_wav(out)
```